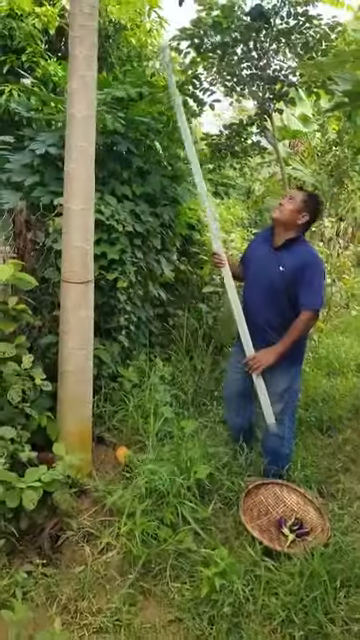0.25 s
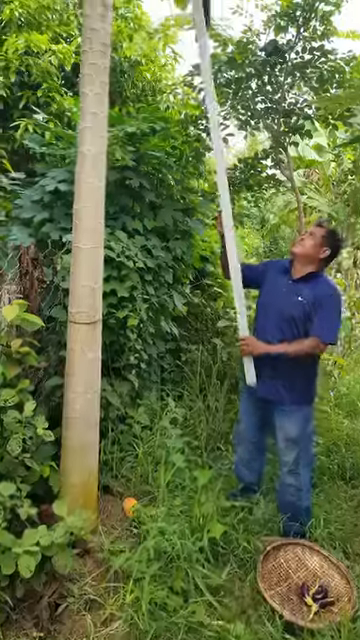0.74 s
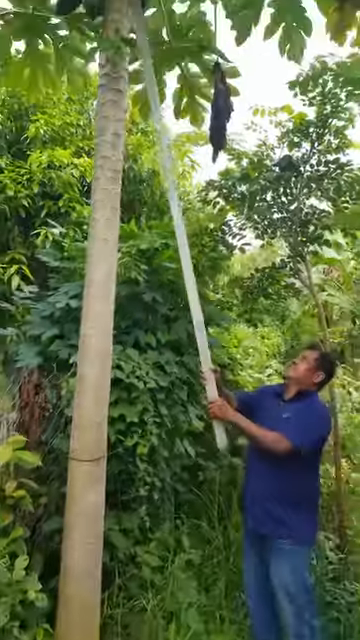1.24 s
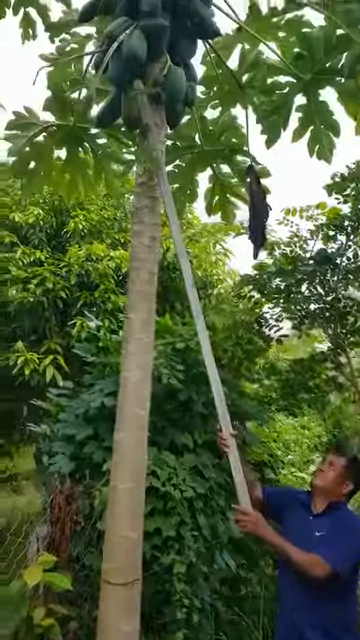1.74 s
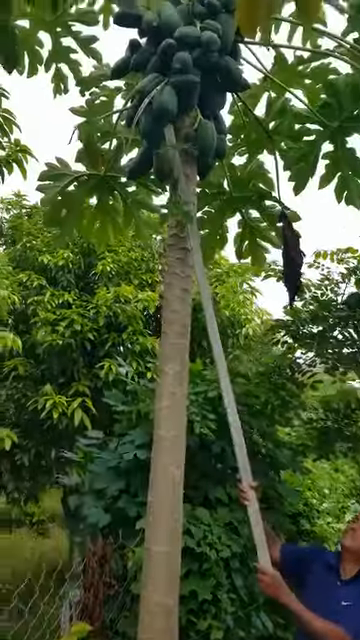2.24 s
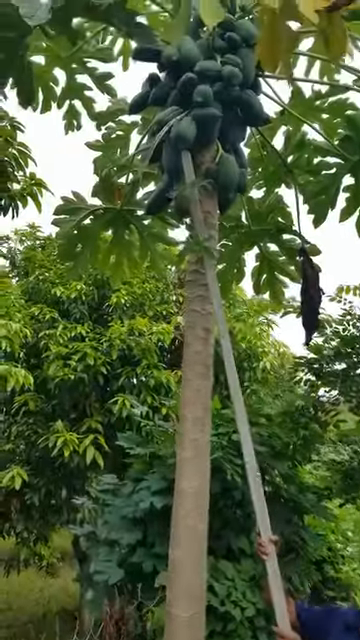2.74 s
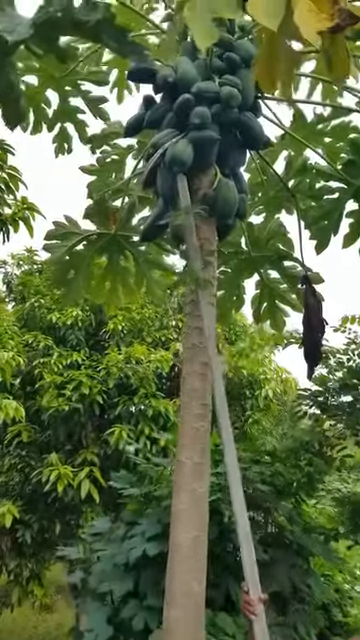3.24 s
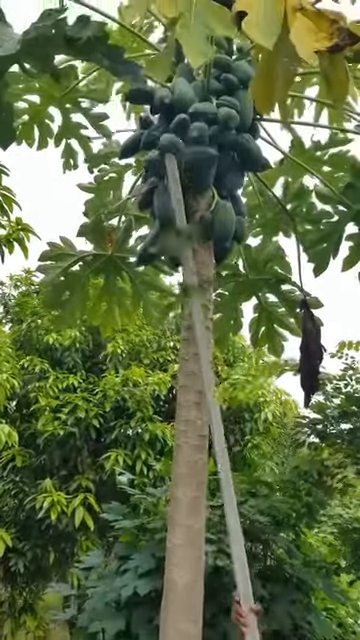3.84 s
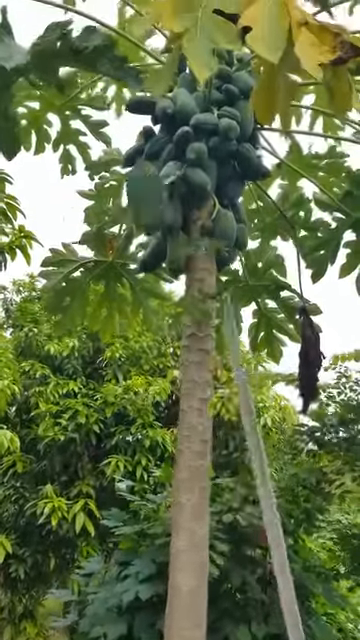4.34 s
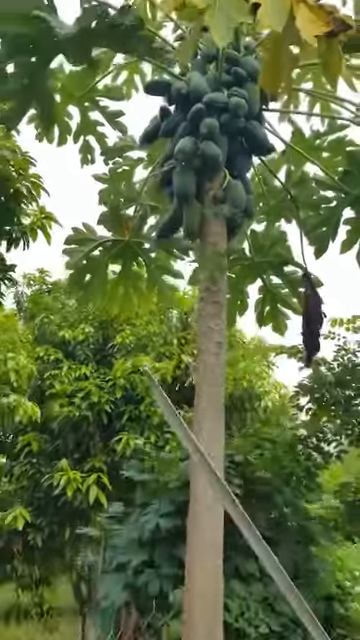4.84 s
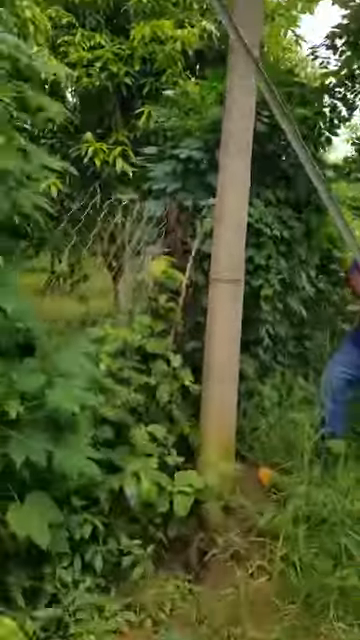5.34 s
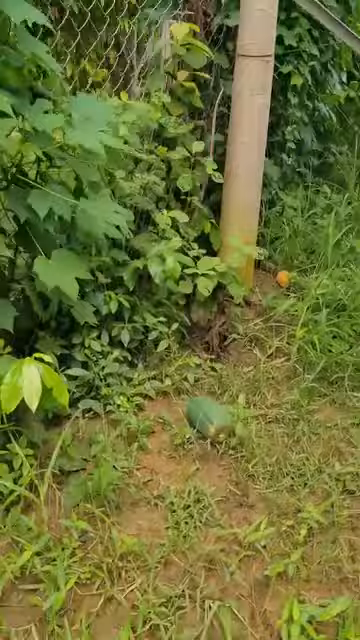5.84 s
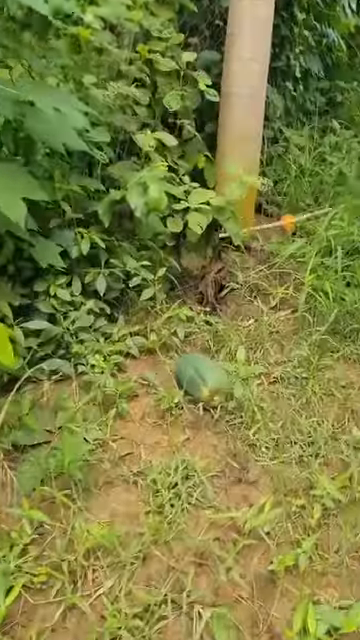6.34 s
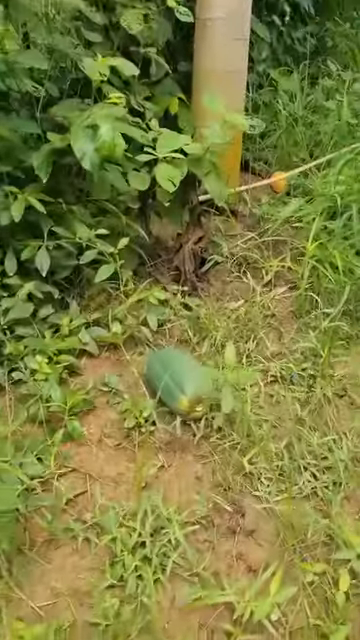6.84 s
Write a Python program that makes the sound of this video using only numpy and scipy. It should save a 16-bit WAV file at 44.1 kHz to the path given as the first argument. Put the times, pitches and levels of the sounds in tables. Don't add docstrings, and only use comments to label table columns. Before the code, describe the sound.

Phone stereo, open air: soft leaf rustle and a couple of light pole knocks over a slow, distant engine chug. A dry crack and leafy burst come as the fruit is pushed off, followed by small ticks and a faint bird whistle. Then one very loud, short thud with a snappy slap on earth, quick small bounces drifting right, a woody knock, and quiet brushing of grass and footsteps.

```python
import sys
import numpy as np
from scipy import signal
from scipy.fft import rfft, irfft, next_fast_len
from scipy.io import wavfile
from scipy.ndimage import uniform_filter1d

SR = 44100
rng = np.random.default_rng(int(sys.argv[2]) if len(sys.argv) > 2 else 0)


def dump_mix(stems):
    frames = np.atleast_2d(stems).T
    limited = np.clip(frames, -1, 1)
    pcm = np.round(limited * 32767).astype(np.int16)
    wavfile.write(sys.argv[1], SR, pcm)


def ratio_of_db(decibels):
    return 10 ** (np.asarray(decibels, float) / 20)


N = 313284
t = np.arange(N) / SR


def level(x, db):
    return x * ratio_of_db(db) / np.sqrt(np.mean(x ** 2))


def curve(points):
    return np.interp(t, *np.transpose(points))


def colour(x, points):
    hz, db = np.transpose(points)
    size = next_fast_len(N)
    f = np.arange(size // 2 + 1) * SR / size + 1
    gain = ratio_of_db(np.interp(np.log(f), np.log(hz), db))
    return irfft(rfft(x, size) * gain, size)[..., :N]


def band(x, lo_hz, hi_hz):
    sos = signal.butter(3, [lo_hz, min(hi_hz, .45 * SR)], "band", fs=SR, output="sos")
    return signal.sosfilt(sos, x)


def ring(x, hz, width_hz):
    return signal.lfilter(*signal.iirpeak(hz, hz / width_hz, SR), x)


def walk(rate):
    k = int(SR / rate)
    x = np.repeat(rng.standard_normal(N // k + 1), k)
    x = uniform_filter1d(uniform_filter1d(x, k), k)[:N]
    return x / x.std()


def pair(likeness):
    mid, side = rng.standard_normal((2, N))
    likeness = np.clip(likeness, 0, 1)
    return np.sqrt(1 + likeness) * mid + np.sqrt(1 - likeness) * side * np.array([[1], [-1]])


def add(out, s, x):
    i = int(s * SR)
    out[..., i:i + x.shape[-1]] += x[..., :N - i]


def thuds():
    # start in seconds, level in dB, contact in ms, sign of the push.
    blows = [
        (4.8973, -10.5, 2.3, 1),
        (4.903, -27, 4.1, 1),
        (4.961, -34, 5.6, 1),
        (5.01, -31.5, 5.6, 1),
        (5.081, -30, 5, -1),
        (5.096, -29.5, 5.2, -1),
        (5.148, -24.5, 6.7, 1),
        (5.165, -28, 5.2, 1),
        (5.199, -29.5, 5.7, -1),
        (3.965, -33.5, 0.81, 1),
    ]
    # frequency in Hz, level in dB, 60 dB decay in seconds.
    soil = [(64, -15.5, 0.4), (84, -18, 0.049), (118.9, -1, 0.045), (170, -6, 0.074), (243, -3, 0.048),
            (405, 1.5, 0.059), (519, -1, 0.036), (640, -15, 0.027), (760, -40, .04)]
    out, tau = np.zeros(N), t[:SR // 2]
    modes = 0
    for hz, db, t60 in soil:
        modes = modes + ratio_of_db(db) * np.sin(2 * np.pi * hz * tau) * np.exp(-np.log(1000) * tau / t60)
    for s, db, contact_ms, sign in blows:
        push = np.hanning(int(contact_ms * SR / 1000))
        add(out, s, sign * ratio_of_db(db) * np.convolve(modes, push / push.sum()))
    pan_db = np.interp(t, [4.94, 5.06], [-1.8, -7])
    left = ratio_of_db(pan_db / 2) * np.roll(out, int(.0003 * SR))
    right = ratio_of_db(-pan_db / 2) * out
    return ratio_of_db(-1.8) * np.array([left, right])


def claps():
    # start in seconds, peak in dB, ring in Hz, fade in ms, left minus right in dB.
    skin_and_pole = [
        (4.8965, 1, 1700, .5, -3.3),
        (4.9040, -7.5, 1850, .9, -2),
        (4.1203, -27.5, 1900, .3, 0),
        (.4272, -41, 1690, 6, 1),
        (.5815, -42, 1000, 6, -1),
    ]
    lag_s_per_db = .00012
    out, tau = np.zeros((2, N)), t[:SR // 50]
    for s, db, hz, fade_ms, pan_db in skin_and_pole:
        x = -np.sin(2 * np.pi * hz * tau) * np.exp(-tau * 1000 / fade_ms)
        add(out[0], s + max(-lag_s_per_db * pan_db, 0), x * ratio_of_db(db + pan_db / 2))
        add(out[1], s, x * ratio_of_db(db - pan_db / 2))
    return out


def strike(out, s, db, hz, pan_db, t60, snap_db):
    tau = t[:SR // 5]
    noise = rng.standard_normal((3, len(tau)))
    fade = np.exp(-np.log(1000) * tau / t60) * (1 - np.exp(-tau / 0.000098))
    body = -np.sin(2 * np.pi * hz * tau) + 3.15 * ring(noise[0] + 0.69 * noise[1:], hz, 0.28 * hz)
    snap = band(noise[0] + .5 * noise[1:], 500, 7200) + .4 * band(noise[1:], 8300, 15000)
    snap *= np.exp(-tau / 0.00078) + 0.31
    port_db = db + np.array([[pan_db], [-pan_db]]) / 2
    x = (0.39 * body + 0.89 * ratio_of_db(snap_db) * snap) * fade * ratio_of_db(port_db)
    lag_s = np.clip(-.00006 * pan_db, -.0003, .0003)
    add(out[0], s + max(lag_s, 0), x[0])
    add(out[1], s + max(-lag_s, 0), x[1])


def slaps():
    # start in seconds, peak in dB, ring in Hz, left minus right in dB, 60 dB decay in seconds.
    slap_rows = [(4.8968, -13, 5100, -1, 0.02), (4.9039, -14, 3540, -6, 0.018),
                 (4.9088, -19, 2000, -12, 0.05), (4.9135, -20.5, 3520, 0.5, 0.071),
                 (4.92, -21, 1760, 4, 0.093), (4.929, -29.5, 3610, -4, 0.17), (4.937, -25, 1615, 2, 0.071),
                 (3.878, -34, 3300, 0, .03), (3.908, -28, 4400, 3, 0.097), (3.921, -28, 600, 1, 0.062),
                 (6.6, -44, 1310, -10, 0.026), (5.372, -36, 604, 0.5, 0.068),
                 (4.8968, -21, 11000, -4, 0.046), (3.896, -28, 11000, 0, 0.054)]
    out = np.zeros((2, N))
    for s, db, hz, pan_db, t60 in slap_rows:
        strike(out, s, db, hz, pan_db, t60, snap_db=2.5 - 240 * t60)
    return out


def knocks():
    # start in seconds, peak in dB, ring in Hz, left minus right in dB, snap in dB.
    knock_rows = [(0.428, -38.5, 1590, 2.5, -14), (0.582, -30.5, 1655, -2, -12.5),
                  (0.593, -38, 1430, -2, -7), (3.895, -25, 1144, 3, 12), (3.966, -30, 468, 3, -14),
                  (4.119, -39, 900, 2.5, 2), (4.166, -35, 492, -1.5, -14), (4.334, -38, 800, 2.5, -8),
                  (5.043, -45, 4800, -3.5, 0), (5.083, -31, 1807, -3, 1.5), (5.141, -37.5, 1800, -4.5, 4),
                  (5.225, -37.5, 1900, -1, 1), (5.365, -25.5, 1018, 1.5, -5.5), (5.529, -41, 4140, 3, -4),
                  (5.634, -48, 544, 10, 9), (5.667, -43.5, 640, 1, 2.5), (5.714, -45.5, 490, -6, -8.5),
                  (6.391, -46, 924, -2, -5)]
    out = np.zeros((2, N))
    for s, db, hz, pan_db, snap_db in knock_rows:
        strike(out, s, db, hz, pan_db, 0.076, snap_db)
    return out


def footfalls():
    # start in seconds, peak in dB, ring in Hz, left minus right in dB, snap in dB.
    steps = [
        (0.201, -52, 1045, -3, -13),
        (6.765, -41.5, 920, 5, -25),
        (6.851, -43, 1836, -2, -18),
        (6.947, -57, 1930, 9, 14),
    ]
    out = np.zeros((2, N))
    for s, db, hz, pan_db, snap_db in steps:
        strike(out, s, db, hz, pan_db, 0.24, snap_db)
    return out


def motion():
    # peak in seconds, level in dB, rise and fall in seconds
    # per 20 dB, dull share in dB.
    sways = [(.08, -71.5, 3.5, 0.5, -0.5), (.4, -72, -1.2, 0, 5), (.55, -64.5, 0.1, 0.6, -1),
             (.8, -64.5, 0.6, 0, 5.5), (1.142, -64, .1, 1.24, 10.5), (1.36, -60.5, 0.03, 0.2, 8),
             (1.58, -55, 0.18, 0.24, -18), (1.62, -58.5, 0.32, 0.16, -0.5), (1.81, -62, 0.7, 0.17, -9),
             (2.05, -68.5, 0.1, 0.2, 3), (2.39, -68.5, .15, 0.6, -8), (2.59, -62, 0.5, 0.38, -7),
             (2.88, -72, 0, 1, -14), (2.978, -56, 0.2, 0.13, -8), (3.2, -67.5, 0, 0.1, -2),
             (3.7, -83, 1, 1.8, 16.5), (3.898, -35, 0.03, 0.0826, 0), (4.02, -55.5, .25, .05, 0),
             (4.29, -61, -0.1, 0.7, -6), (4.55, -61.5, 1.14, 0.24, 5), (4.84, -70, 0.2, 17, -12)]
    # start in seconds, level in dB, fall in seconds
    # per 20 dB, dull share in dB.
    bursts = [(.204, -57, 0.06, -5), (.43, -58.5, 0.13, 6), (.588, -60.5, 0.27, 6), (3.94, -45.5, 0.18, 3),
              (4.125, -58, .06, -2), (4.345, -58.5, -0.25, 15.5), (4.902, -30.5, 0.0624, -1),
              (4.93, -39.5, 0.1039, -2.5), (5.045, -55, 0.53, -10), (5.086, -42.5, 0.0945, -11),
              (5.143, -48, .05, 0), (5.186, -54, .12, -4), (5.23, -48.5, 0.08, -5.5), (5.32, -72, .4, -7),
              (5.373, -44.5, 0.03, 0), (5.705, -56, .05, -5), (5.722, -53, .11, -8)]
    grass = [
        (5.524, -49.5, 0.2, .24, -0.5),
        (5.77, -61, 0.36, .06, -2),
        (5.99, -68, .05, .5, 6),
        (6.12, -63.5, 0.12, 0.44, -13),
        (6.29, -59, 0.28, 0.51, -9),
        (6.42, -60, 0.47, 0.25, 4),
        (6.76, -64, 0.11, 0.26, 9),
        (6.856, -57, 0.24, 0.22, 3.5),
        (6.98, -58, 0.35, 0.27, -22),
        (7.1, -57, 0.19, .3, -11),
    ]
    # time in seconds, level in dB.
    breeze = [(0, -66.5), (.5, -61), (1.2, -58.5), (1.9, -61.5), (2.7, -57.5), (3.3, -60), (3.75, -53),
              (4.4, -56), (4.85, -67), (5.75, -63.5), (5.88, -79), (6.1, -72), (7.1, -82)]
    breeze_db = curve(breeze)
    still_db = np.full(N, -109.0)
    dull_db = -73 + .4 * (breeze_db + 62)
    dry_db = np.full(N, -84.0)
    power = ratio_of_db(2 * np.array([still_db, dull_db, dry_db, breeze_db]))
    sudden = [(s, db, 0.0088, fall, dull) for s, db, fall, dull in bursts]
    for table, stem_db in ((sways + sudden, -4), (grass, -8)):
        for s, db, rise, fall, dull in table:
            drop = np.where(t < s, (s - t) / max(rise, .002), (t - s) / max(fall, .01))
            tone_db = np.array([0, dull, -5.5 - 0.071 * dull, stem_db + 0.34 * dull])
            power += ratio_of_db(2 * tone_db)[:, None] * ratio_of_db(2 * (db - 20 * drop))
    leaf_db, *others = 10 * np.log10(power)
    return leaf_db, *(db - leaf_db for db in others)


def rustle():
    # frequency in Hz, density in dB per Hz.
    leaves = [(300, 11), (600, 9.5), (900, 6), (1600, 7), (2300, 4), (3500, -0.5), (5500, 1), (6800, -4.5),
              (7800, -5.5), (9000, 0.5), (12000, 1.5), (16000, -7)]
    leaf_db, dull_db, dry_db, stem_db = motion()
    tick_db = 2.0 * rng.exponential(size=N // 8 + 1).repeat(8)[:N]
    ticks = colour(pair(.03) * ratio_of_db(tick_db + 1.5 * walk(60)), leaves)
    ticks /= band(ticks, 2400, 7000).std()
    edges = np.geomspace(420, 15800, num=17)
    out = 0
    for lo, hi in zip(edges, edges[1:]):
        log_hz = np.log(lo * hi) / 2
        stem = np.interp(log_hz, np.log([650, 1500]), [1, 0])
        dull = np.interp(log_hz, np.log([650, 1500, 2900]), [0, 1, 0])
        dry_share = np.interp(log_hz, np.log([6500, 9500]), [0, 1])
        tone_db = stem * stem_db + dull * dull_db + dry_share * dry_db
        out = out + band(ticks, lo, hi) * ratio_of_db(tone_db + 2.0 * walk(14))
    return out * ratio_of_db(leaf_db + 0.67) * ratio_of_db(np.array([[-.7], [.7]]))


def engine_levels():
    # time in seconds, exhaust level in dB.
    exhaust_points = [(0, -55), (.17, -51.5), (.45, -56.5), (.6, -46.5), (1.0, -51.5), (1.68, -44),
                      (1.96, -47), (2.17, -43.5), (3.28, -46), (3.8, -43), (4.1, -45.5), (4.55, -50),
                      (4.75, -59), (4.85, -52), (5.85, -54), (6.6, -51.5), (7.1, -60)]
    exhaust_db = curve(exhaust_points)
    late = t - 1.25
    slope_db_per_s = np.where(late < 0, 6, -3.8)
    return exhaust_db, -51.5 + slope_db_per_s * late - exhaust_db


def engine():
    # time in seconds, firings per second.
    engine_rate = [(0, 21.35), (.35, 22), (.6, 21.45), (.85, 21.1), (1.6, 20.87), (2.35, 20.7),
                   (2.6, 21.16), (3.1, 20.92), (3.6, 20.74), (4.1, 20.9), (4.6, 20.5), (5.6, 20.95)]
    # frequency in Hz, width in Hz, level in dB.
    exhaust = [(93, 36.4, -1.5), (120.3, 27.3, 0.5), (167, 65, -12)]
    # frequency in Hz, width in Hz, level in dB.
    rumble = [(247, 68, 1), (380, 59, -4.5), (601, 240, -19)]
    exhaust_db, rumble_db = engine_levels()
    s, rate = np.transpose(engine_rate)
    phase = .47 + np.cumsum(rate[np.searchsorted(s, t, "right") - 1]) / SR
    firings = np.flatnonzero(np.diff(np.floor(phase)))
    chance = rng.standard_normal((200, 2))[:len(firings)]
    jittered = np.clip(firings + (25 * chance[:, 0]).astype(int), 0, N - 1)
    pulses = np.zeros(N)
    pulses[jittered] = ratio_of_db(1.6 * chance[:, 1])
    pulses += ratio_of_db(-14) * np.roll(pulses, int(.024 * SR))
    scatter = rng.standard_normal(N) * (0.34 + np.exp(-(phase % 1) / 0.35))
    drive = level(pulses, 0) + level(scatter, -11)
    low = 0
    for k, (hz, width, db) in enumerate(exhaust):
        low = low + (-1) ** k * ratio_of_db(db) * ring(ring(drive, hz, width), hz, 1.76 * width)
    drive = level(pulses, -6.5) + level(scatter, 0)
    high = 0
    for hz, width, db in rumble:
        high = high + ratio_of_db(db) * ring(ring(drive, hz, width), hz, 0.82 * width)
    mono = ratio_of_db(exhaust_db) * (level(low, -0.52) + ratio_of_db(rumble_db) * level(high, -1.7))
    return mono * ratio_of_db(np.array([[-.6], [.6]]))


def bird():
    # start in seconds, length in seconds, top pitch in Hz, top level in dB, sag at the ends in Hz.
    whistles = [
        (2.285, .065, 3930, -74, 60),
        (2.35, .3, 3530, -60.5, 150),
        (4.335, .23, 3440, -59, 30),
    ]
    out = np.zeros(N)
    for s, length, top_hz, top_db, sag_hz in whistles:
        place = np.clip(2 * (t - s) / length - 1, -1, 1)
        gate = np.clip(np.minimum(t - s, s + length - t) / 0.007, 0, 1)
        hz = top_hz - sag_hz * place ** 2 + 28 * walk(400)
        throb_db = 3 * np.cos(np.pi * 9.3 * length * place)
        db = top_db - 9 * place ** 2 + throb_db + 1.8 * walk(70)
        out += gate * ratio_of_db(db) * np.sin(2 * np.pi * np.cumsum(hz) / SR)
    return out * ratio_of_db(np.array([[.5], [-.5]]))


def air():
    # frequency in Hz, density in dB per Hz.
    air_spectrum = [(12, -40), (20, -14), (70, -6), (113, -6.5), (388, -19.5), (527, -27), (780, -31),
                    (1090, -26.5), (2390, -50.5), (5530, -44.5), (7730, -49), (11800, -42.5), (16000, -46)]
    wind = band(pair(1.0), 25, 65) * ratio_of_db(3.4 * walk(6.6))
    return level(colour(pair(0.53), air_spectrum), -53.5) + level(wind, -57.0)


def scene():
    fruit = thuds() + claps() + slaps() + knocks()
    return fruit + footfalls() + rustle() + engine() + bird() + air()


def roll_off(x):
    return signal.sosfilt(signal.butter(12, 16440, fs=SR, output="sos"), x)


def record(dry):
    x = signal.sosfilt(signal.butter(4, 42, "high", fs=SR, output="sos"), dry)
    x = x - 0.65 * ring(x, 7800, 300)
    x = signal.sosfilt(signal.ellip(10, .3, 60, 15800, fs=SR, output="sos"), x)
    return roll_off(np.clip(x, -1, 1))


dry = scene()
out = record(dry)
dump_mix(out)
```